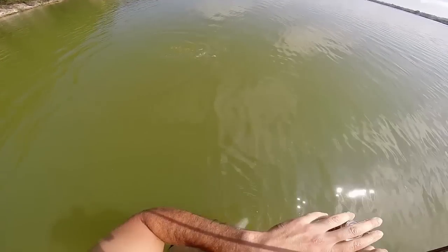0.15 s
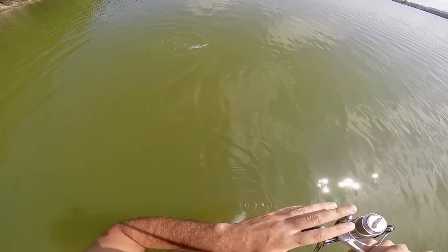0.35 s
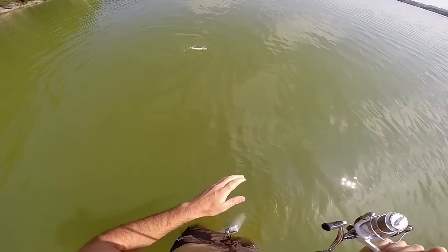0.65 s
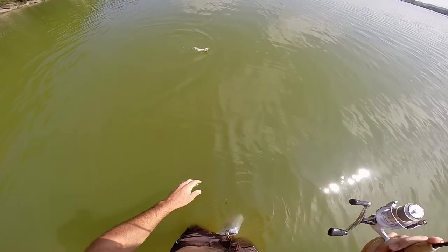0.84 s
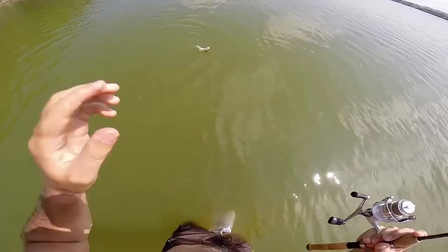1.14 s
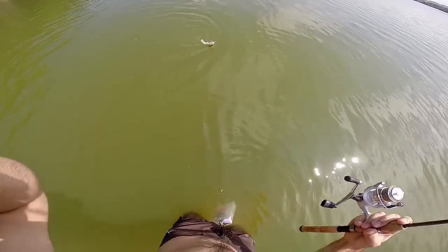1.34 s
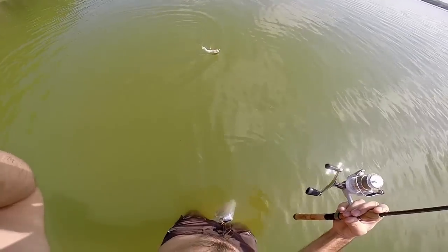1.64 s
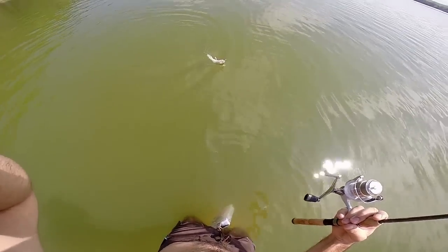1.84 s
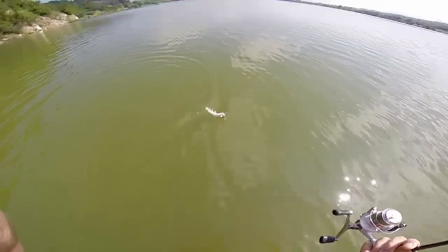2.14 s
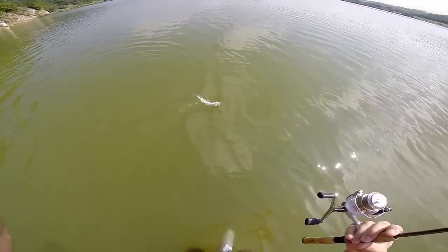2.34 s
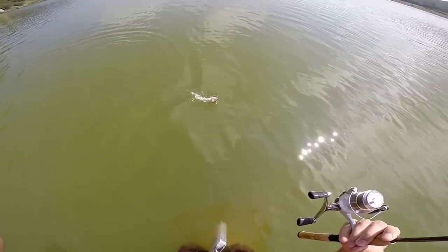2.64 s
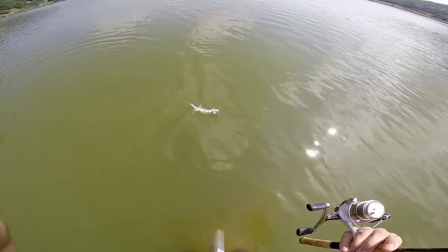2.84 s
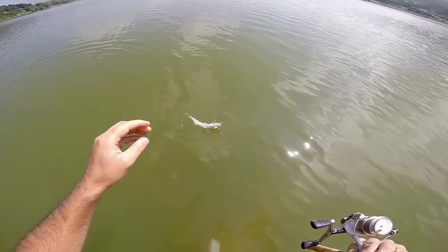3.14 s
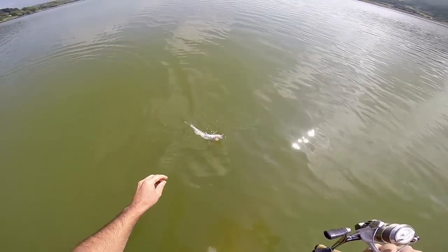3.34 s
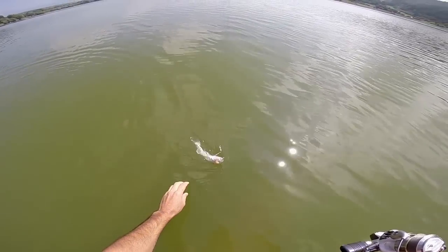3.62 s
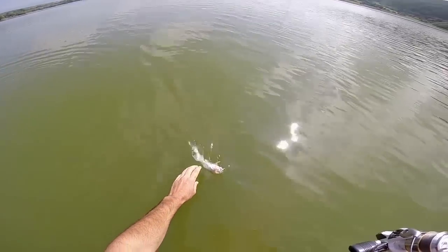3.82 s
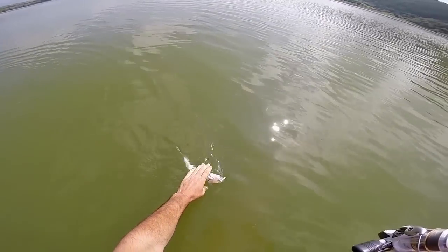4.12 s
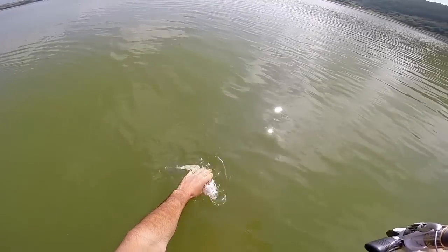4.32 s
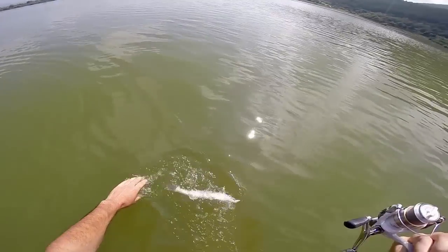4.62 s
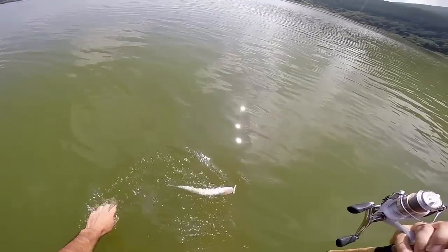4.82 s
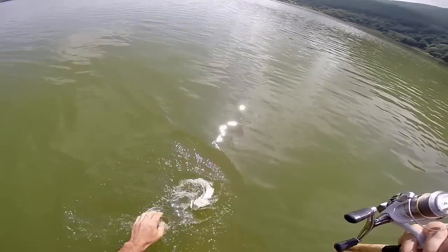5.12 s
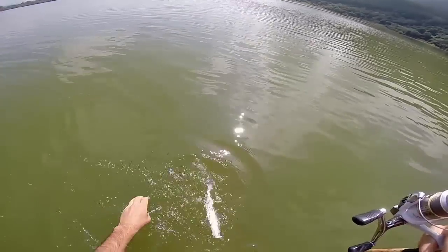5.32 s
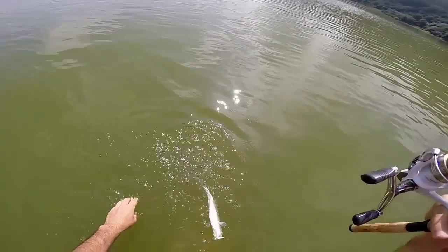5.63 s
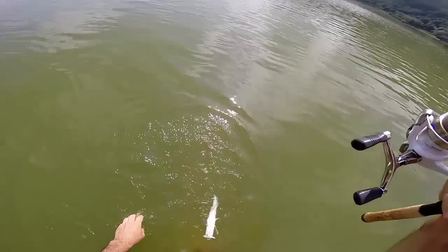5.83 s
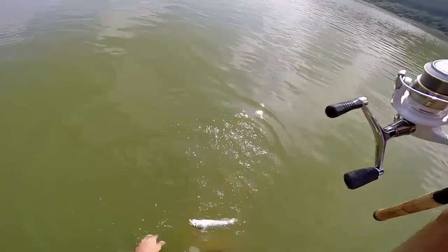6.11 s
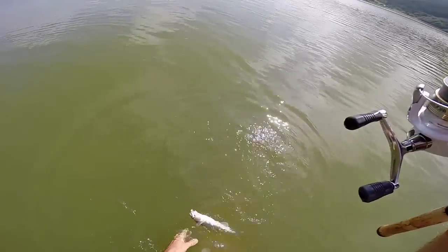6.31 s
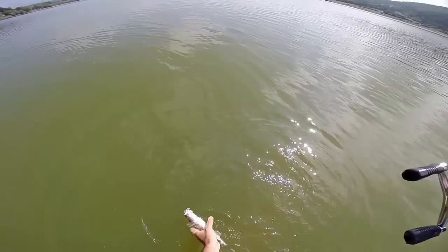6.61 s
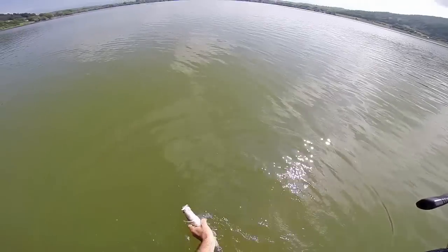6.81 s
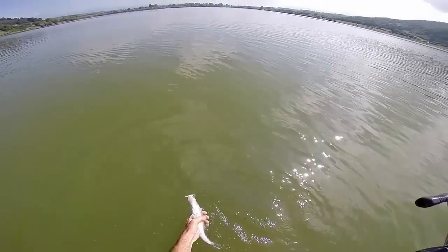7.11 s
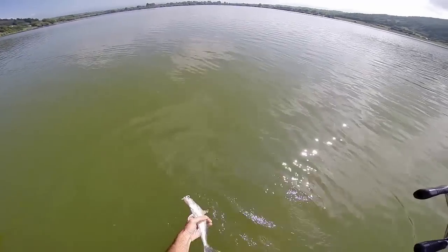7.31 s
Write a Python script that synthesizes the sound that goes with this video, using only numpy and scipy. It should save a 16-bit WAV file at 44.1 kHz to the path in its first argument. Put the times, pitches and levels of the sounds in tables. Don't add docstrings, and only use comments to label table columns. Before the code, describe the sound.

Fingers bump and scrape a camera housing with a harsh overloaded jolt, then two short, muffled bursts of fish splashing and bubbling on a quiet lake.

```python
import sys
import numpy as np
from scipy import signal
from scipy.fft import rfft, irfft, next_fast_len
from scipy.io import wavfile
from scipy.ndimage import uniform_filter1d, map_coordinates

SR = 44100
rng = np.random.default_rng(int(sys.argv[2]) if len(sys.argv) > 2 else 0)


def to_wav(s):
    ch = np.atleast_2d(s).T
    pcm = np.round(np.clip(ch, -1, 1) * 32767)
    wavfile.write(sys.argv[1], SR, pcm.astype(np.int16))


def how_loud(loudness_db):
    steps = np.asarray(loudness_db, float) / 20
    return 10 ** steps


N = 328942


def unit(x):
    return x / np.sqrt(np.mean(x ** 2) + 1e-20)


def curves(rows):
    seconds, *columns = np.transpose(rows)
    t = np.arange(N) / SR
    return np.array([np.interp(t, seconds, column, -120, -120) for column in columns])


def wobble(rate):
    knots = rng.standard_normal(int(N * rate / SR) + 4)
    return map_coordinates(knots, [np.arange(N) * rate / SR])


def swells(rows, rise, fall):
    t = np.arange(N) / SR
    power = 1e-12
    for s, hold, *db in rows:
        shape_db = -rise * np.maximum(s - t, 0) - fall * np.maximum(t - s - hold, 0)
        power = power + how_loud(2 * np.array(db))[:, None] * how_loud(2 * shape_db)
    return 10 * np.log10(power)


def filtered(x, response):
    m = next_fast_len(len(x) + 8192)
    spectrum = rfft(x, m) * response(np.fft.rfftfreq(m, 1 / SR))
    return irfft(spectrum, m)[:len(x)]


def noise(spectrum):
    f, db = np.transpose(spectrum)
    white = rng.standard_normal(N)
    return unit(filtered(white, lambda hz: how_loud(np.interp(np.log(hz + 1), np.log(f), db))))


def band(x, lo_hz, hi_hz):
    sos = signal.butter(3, [lo_hz, min(hi_hz, SR / 2.1)], "band", fs=SR, output="sos")
    return signal.sosfilt(sos, x)


def grit(per_second, spread_db):
    chance, size = rng.random((2, N))
    hits = (chance < per_second / SR) * how_loud(-abs(spread_db) * np.log(size + 1e-3))
    return rng.standard_normal(N) * (1 + 3 * hits)


def add(out, s, x):
    part = out[round(s * SR):][:len(x)]
    part += x[:len(part)]


# centre in Hz, width in Hz, level in dB per wall.
SHELL_MODES = [(296, 190, -6), (610, 560, -2), (1050, 370, -4.5), (1550, 660, -2.5), (2267, 480, -2),
               (2515, 540, -0.5), (3470, 1130, -1.5), (4520, 1550, -8), (6000, 2600, -8),
               (8560, 6500, -23.5)]


def shell(x):
    def one_wall(f):
        return sum(how_loud(db) * 1j * f * w / (c * c - f * f + 1j * f * w) for c, w, db in SHELL_MODES)
    return filtered(x, lambda f: one_wall(f) ** 2)


def three(x, top_hz):
    y = shell(x)
    return np.array([unit(band(y, 494, 1554)), unit(band(y, 1800, 3000)), unit(band(y, 2880, top_hz))])


# centre in seconds, signed push, width in ms, mount resonance in Hz.
LOOSE_JOLTS = [(1.5139, -0.37, 3.1, 45), (1.6057, 0.133, 6.7, 19), (1.7249, 0.077, 1.3, 15),
               (1.816, 0.149, 9, 40), (1.859, -0.062, 3.3, 34), (1.8928, -0.079, 7.9, 26),
               (1.9863, -0.092, 0.8, 80), (2.0065, 0.201, 3, 28), (2.0603, -0.16, 9, 18),
               (2.1343, 0.824, 2, 31), (4.43, -0.025, 5, 25), (4.4631, 0.14, 5.7, 19),
               (4.5077, -0.56, 8.5, 46), (4.7476, -0.042, 2.9, 33), (5.2431, 0.026, 3.9, 15),
               (5.2858, 0.043, 4.6, 33), (5.3229, 0.059, 9, 37), (5.571, 0.077, 8.8, 45),
               (5.667, -0.042, 5.2, 32), (6.6285, 0.032, 6.7, 36)]
# centre in seconds, signed push, width in ms, mount resonance in Hz.
TIGHT_JOLTS = [(1.7742, -0.7, 5.7, 37), (1.9804, 0.11, 2.4, 19), (2.156, .12, 5, 14),
               (2.1874, -0.078, 2.17, 17), (2.1986, -2.32, 0.71, 17), (2.2004, -0.602, 0.7, 17),
               (2.2961, -0.2, 3.9, 18), (2.3743, 0.1, 2.4, 18), (2.5528, 0.6, 1.6, 13),
               (2.6251, 0.14, 9, 16), (2.9056, 0.75, 8.7, 70), (4.5826, -0.45, 9, 34),
               (4.62, -0.055, 5, 18)]
# centre in seconds, signed push, width in ms.
POKES = [(1.511, -.06, 1.8), (1.996, -0.08, 1.2), (2.0265, -0.07, 0.8), (2.0573, 0.055, 1.1),
         (2.1962, -.1, 1.2), (2.5517, .45, .5), (2.5531, .1, .25), (2.75, -0.06, 1.2), (2.762, -0.06, 1.3),
         (2.854, 0.055, 1.1)]
LOOSE_DAMPING, TIGHT_DAMPING, POKE_HZ = 0.29, 0.94, 22


def jolts():
    out = np.zeros(N)
    t = np.arange(-1024, 7168) / SR
    tight = TIGHT_JOLTS + [(*row, POKE_HZ) for row in POKES]
    for rows, damping in (LOOSE_JOLTS, LOOSE_DAMPING), (tight, TIGHT_DAMPING):
        for s, push, ms, hz in rows:
            leak = lambda f: -f * f / (hz * hz - f * f + 2j * damping * hz * f)
            bump = push * np.exp(-.5 * (1000 * t / ms) ** 2)
            add(out, s - 1024 / SR, filtered(bump, leak))
    return out


# start in seconds, peak in dB, treble in dB, ring in Hz, ring t60 in ms.
TICKS = [(1.5023, -28.5, -3, 1180, 18), (1.6109, -22.5, -8, 1590, 29), (1.7306, -25, -17, 2170, 18),
         (1.7606, -33, -17, 2340, 17), (1.8582, -41, -7, 1120, 17), (2.0994, -24, -27, 2330, 15),
         (2.1224, -29, -16, 1030, 14), (2.1993, -16, -11, 1380, 5.8), (2.2513, -34, -23, 2220, 17),
         (2.3261, -27, -25, 2100, 7.4), (2.4713, -36.5, -23, 1162, 8.4), (2.4917, -42.5, -27, 1420, 12),
         (2.552, -27.5, -24.5, 750, 25), (2.6638, -39, -36, 2170, 14), (2.7467, -39, -33, 1150, 14),
         (2.7599, -37.5, -29, 890, 45), (2.831, -20.5, -29, 1490, 10), (2.85, -35.5, -18, 1050, 28),
         (2.8833, -37, -22, 1550, 17), (2.9322, -48.5, -19, 2370, 17), (2.9417, -46, -18, 2200, 14)]
# start in seconds, peak in dB.
JUDDER = [(1.951, -40), (1.973, -33), (1.986, -22.5), (1.9938, -28), (2.0066, -20.5), (2.012, -38),
          (2.0258, -26.5), (2.042, -37), (2.0518, -24), (2.0577, -25), (2.066, -22.5)]
JUDDER_TREBLE_DB, JUDDER_HZ, JUDDER_T60_MS = -13.5, 2695, 14
TICK_LOW_DB = -8.5
TICK_DULL = 0.26


def ticks():
    out = np.zeros(N)
    t = np.arange(2048) / SR
    judder = [(*row, JUDDER_TREBLE_DB, JUDDER_HZ, JUDDER_T60_MS) for row in JUDDER]
    for s, db, high_db, hz, t60 in TICKS + judder:
        chatter = rng.standard_normal(len(t)) * how_loud(-60000 * t / t60)
        chatter[2] -= 3
        parts = three(chatter, top_hz=13700) * how_loud(-np.outer([0, 0, 3000], t))
        parts /= np.abs(parts).max(axis=1, keepdims=True)
        ring = np.sin(2 * np.pi * hz * t) * how_loud(-60000 * t / (0.73 * t60)) * np.tanh(t / 0.00063)
        part_db = np.array([TICK_LOW_DB - TICK_DULL * high_db, -2, high_db + 4])
        add(out, s, how_loud(db + part_db) @ parts - how_loud(db + 2.5) * ring)
    return out


# start in seconds, hold in seconds, skin in dB, pressure in dB.
STROKES = [(1.63, 0.0046, -54.5, -43), (1.79, 0.078, -63.5, -59), (1.945, .03, -50.5, -41),
           (1.99, 0.12, -48, -38), (2.21, .04, -50.5, -44), (2.29, 0.012, -61, -43),
           (2.36, 0.14, -59.5, -50.5), (2.54, 0.022, -62, -38.5), (2.68, 0.055, -56, -44.5),
           (2.74, 0.025, -53, -44.5), (2.79, 0.075, -56, -47)]
STROKE_RISE, STROKE_FALL = 190, 240
# time in seconds, share of the upper of the two main resonances from 0 to 1.
GRIP = [(0, 0.1), (1.9, 0.1), (1.95, .9), (2.08, 0.8), (2.11, 0.04), (2.66, 0.2), (2.78, 0.25), (7.46, .6)]


def strokes():
    low, mid, high = three(grit(1500, spread_db=1.2), top_hz=6200)
    upper = np.clip(curves(GRIP)[0], 0, 1)
    upper_panel = np.sqrt(upper) * unit(band(mid, 2480, 3000))
    lower_panel = np.sqrt(1 - upper) * unit(band(mid, 1900, 2650))
    friction = unit(upper_panel + lower_panel) + 1.4 * low + 0.27 * high
    knead = noise([(60, 5.5), (150, 2.0), (300, -3.0), (450, -10.5), (1200, -58)])
    skin_db, press_db = swells(STROKES, STROKE_RISE, STROKE_FALL)
    return how_loud(skin_db + 1.5 * wobble(60)) * friction + how_loud(press_db + 6.6 * wobble(40)) * knead


# peak time in seconds, body in dB, bright part in dB, rise in ms, fall in ms.
SCRAPES = [(1.609, -41, -43, 10.5, 2.1), (1.729, -37.5, -44.5, 7.2, 11), (1.763, -44, -48, 13.6, 17),
           (2.251, -42, -53, 18, 23), (2.554, -33.5, -47, 1.7, 8.5), (2.57, -49.5, -58.5, 10, 28),
           (2.884, -50, -55, 8, 12), (1.607, -62, -54, 6, 7.8), (1.811, -68, -56, 12, 12),
           (2.83, -57, -40.5, 1.2, 4.6), (2.61, -69, -70, 1, 2), (3.045, -70, -58, 1, 2),
           (4.468, -60, -54, 2, 6.5), (4.733, -59, -60, 1, 0.67), (4.741, -60, -52, 2, 4.2),
           (4.795, -56, -60, 2, 3), (4.931, -69, -53.5, 2, 3.7)]


def scrapes():
    low, mid, high = three(grit(3100, spread_db=0.5), top_hz=6460)
    air = unit(band(shell(grit(4400, spread_db=6.0)), 3700, 11500))
    t = np.arange(N) / SR
    out = np.zeros(N)
    for s, db, bright_db, rise, fall in SCRAPES:
        stroke = np.exp(-(1000 * np.where(t < s, (s - t) / rise, (t - s) / fall)) ** 2)
        body = how_loud(db) * (mid + 0.8 * low)
        bright = how_loud(bright_db) * (high + 2.6 / fall * air)
        out += stroke * (body + bright)
    return out


# start in seconds, hold in seconds, churn in dB, slosh in dB, spray in dB.
BEATS = [(4.29, .05, -65, -68, -63), (4.428, .03, -50.5, -53, -53.5), (4.455, 0.021, -43.5, -44, -57),
         (4.5, 0.024, -45.5, -52, -58), (4.535, 0.014, -41.5, -42.5, -58), (4.61, 0.018, -49, -50, -60),
         (4.67, 0.083, -52, -51.5, -67), (4.82, 0.13, -62, -74, -67), (5.155, 0.047, -55.5, -58, -49.5),
         (5.245, 0.046, -48.5, -51.5, -56.5), (5.34, 0.081, -58, -61, -62.5),
         (5.52, 0.073, -60, -56.5, -76), (6.66, 0.29, -61, -63.5, -69)]
BEAT_RISE, BEAT_FALL = 860, 190
SWIRL_DB, SWIRL_GROWS, SLOSH_FULL_DB = -36.5, 1.7, -41.5


def thrash():
    low, mid, _ = three(grit(1500, spread_db=1.5) * how_loud(.8 * wobble(90)), top_hz=10000)
    high = three(grit(600, spread_db=5.0), top_hz=10100)[2]
    deep = unit(band(shell(rng.standard_normal(N)), 99, 342))
    slosh = how_loud(1.4 * wobble(60)) * low
    spray = how_loud(3.3 * wobble(70)) * high
    swirl = how_loud(2.1 * wobble(25)) * deep
    churn_db, slosh_db, spray_db = swells(BEATS, BEAT_RISE, BEAT_FALL)
    swirl_db = SWIRL_DB + SWIRL_GROWS * (slosh_db - SLOSH_FULL_DB)
    return how_loud(churn_db) * mid + how_loud(slosh_db) * slosh + how_loud(spray_db) * spray + how_loud(swirl_db) * swirl


# start in seconds, level in dB, start pitch in Hz, end pitch in Hz, life in ms.
BUBBLES = [
    (4.453, -40, 264, 296, 15),
    (4.49, -46, 1020, 1090, 9.1),
    (4.534, -35, 240, 298, 15),
    (4.545, -45, 1010, 1030, 9.1),
    (4.624, -42, 870, 980, 5.5),
    (5.15, -51.5, 955, 1010, 17),
    (5.234, -50.5, 168, 226, 35),
    (5.305, -47.5, 309, 904, 38),
]
# start in seconds, level in dB, pitch in Hz.
DROPS = [(4.427, -41, 1570), (4.428, -42, 2800), (4.434, -49, 6000), (4.508, -51, 4400), (4.616, -59, 6300),
         (4.687, -44, 2200), (4.846, -50, 1320), (5.093, -61, 5700), (5.147, -48, 2920),
         (5.156, -43.5, 5450), (5.166, -56, 2800), (5.173, -39.5, 3780), (5.181, -46, 4260),
         (5.195, -51, 6000), (5.21, -60, 5800), (6.665, -61, 7100), (6.733, -58, 7200), (6.79, -61, 7000),
         (6.838, -61, 7200), (6.95, -56, 2450), (6.96, -61, 7200), (5.282, -46, 2630), (5.29, -53, 5900),
         (5.345, -46, 2870), (5.387, -41, 2170), (5.405, -58, 6100), (5.463, -59, 6160)]
DROP_RISE, DROP_MS = 1.02, 4


def bubbles():
    out = np.zeros(N)
    t = np.arange(1, 8192) / SR
    drops = [(s, db, hz, DROP_RISE * hz, DROP_MS) for s, db, hz in DROPS]
    for s, db, hz, end_hz, ms in BUBBLES + drops:
        age = 1000 * t / ms
        shake = 1 + .07 * wobble(700)[:len(t)]
        pitch = shake * (hz + (end_hz - hz) * np.tanh(age / 1.73))
        swell = np.e * age * np.exp(-age ** 2)
        add(out, s, how_loud(db) * swell * np.sin(2 * np.pi * np.cumsum(pitch) / SR))
    return out


# time in seconds, level in dB.
SWAY = [(0, -51), (.2, -42.5), (.5, -60), (1.0, -50.5), (1.45, -54), (1.65, -41), (2.3, -46), (2.95, -46.5),
        (3.3, -46.5), (3.75, -44), (3.98, -45.5), (4.2, -49), (4.55, -37), (4.95, -50), (5.7, -44),
        (6.1, -52), (6.7, -42.5), (7.46, -53.5)]
# frequency in Hz, density in dB per Hz.
STRAP_COLOUR = [(10, -19), (22, 4.5), (40, 10.5), (65, -3.5), (100, -12), (200, -50.5)]


def sway():
    lumps = unit(how_loud(2.5 * wobble(14)) * noise(STRAP_COLOUR))
    return how_loud(curves(SWAY)[0] + wobble(4)) * lumps


# frequency in Hz, density in dB per Hz.
HISS_COLOUR = [(35, -30), (60, -1.5), (80, -2.5), (160, -4), (1280, -15), (5470, -26), (12500, -39),
               (15500, -40.5)]
HISS_DB = -50.5
# start in seconds, change in dB.
DUCK_STEPS = [
    (2.2, -9),
    (2.285, -10),
]
DUCK_ATTACK_S, RECOVER_S, RECOVER_DB_PER_S = .012, 2.305, 22.5


def hiss():
    t = np.arange(N) / SR
    down_db = sum(db * np.tanh(np.maximum(t - s, 0) / DUCK_ATTACK_S) for s, db in DUCK_STEPS)
    duck_db = np.minimum(down_db + RECOVER_DB_PER_S * np.maximum(t - RECOVER_S, 0), 0)
    return how_loud(HISS_DB + duck_db + 0.6 * wobble(7)) * noise(HISS_COLOUR)


def scene():
    handling = jolts() + ticks() + strokes() + scrapes()
    fish = thrash() + bubbles()
    return (handling + fish + sway() + hiss())[None]


# frequency in Hz, level in dB.
FAINT = [(8000, -125), (10500, -106), (12500, -105), (14000, -103), (14900, -101), (15200, -76)]


def thinned(x):
    hz, _, z = signal.stft(x, SR, nperseg=2048)
    limit = how_loud(np.interp(hz, *np.transpose(FAINT), left=-200))[:, None]
    level = np.sqrt(np.abs(uniform_filter1d(np.abs(z) ** 2, size=24, axis=1)))
    lost = (level < limit) | (np.abs(z) < .7 * limit)
    return x - signal.istft(z * lost, SR, nperseg=2048)[1][:, :N]


def roll_off(x):
    return signal.sosfilt(signal.butter(12, 15780, fs=SR, output="sos"), x)


def record(dry):
    clipped = np.clip(dry, -1, 1)
    mix = np.clip(thinned(clipped), -1, 1)
    return roll_off(mix)


dry = scene()
out = record(dry)
to_wav(out)
```